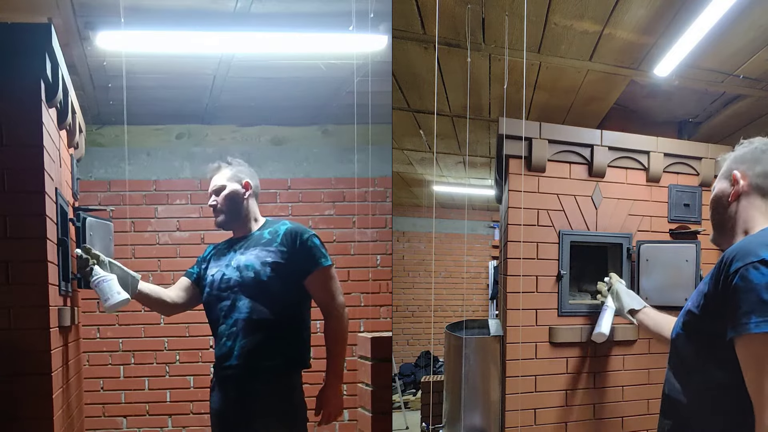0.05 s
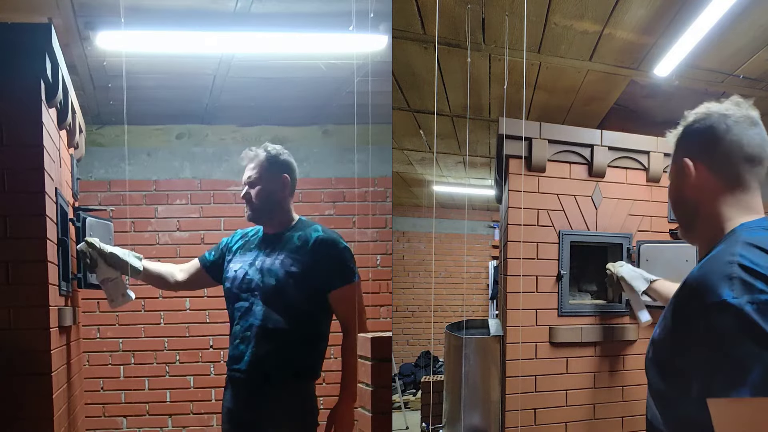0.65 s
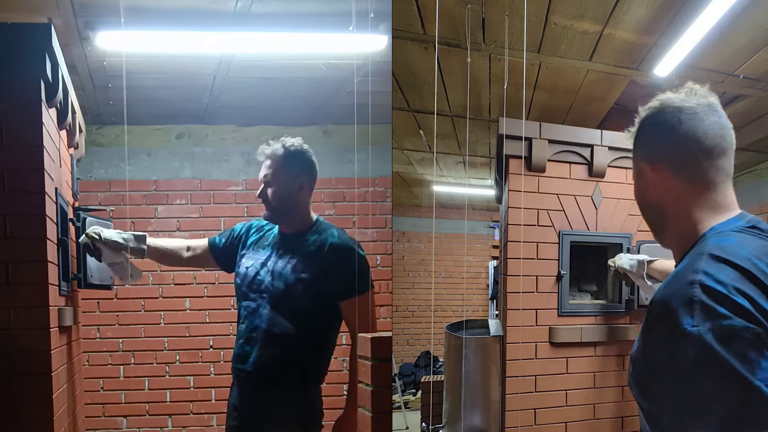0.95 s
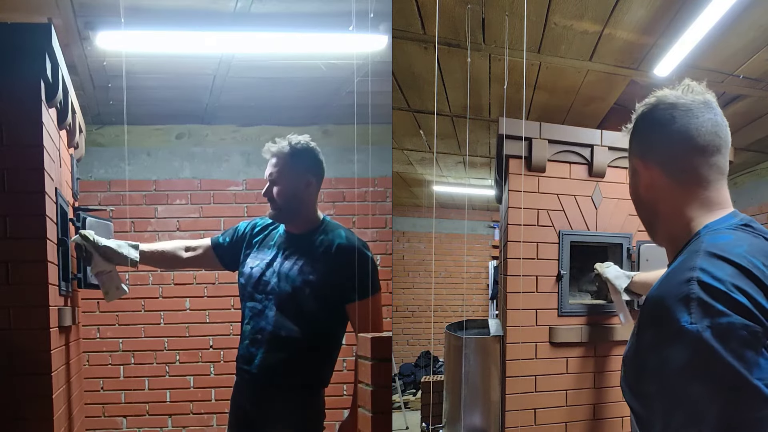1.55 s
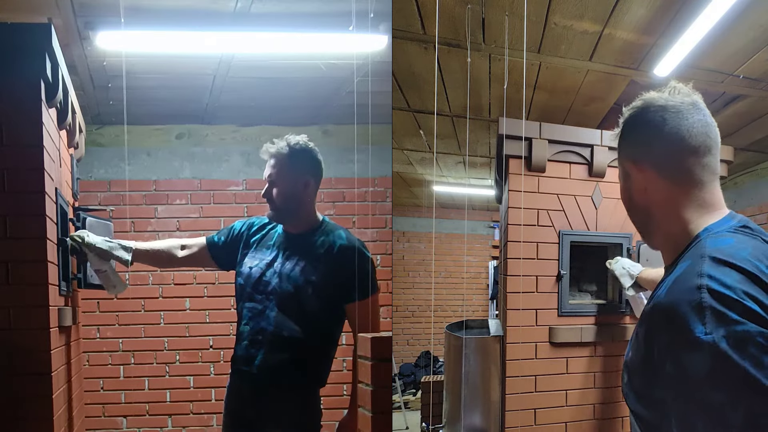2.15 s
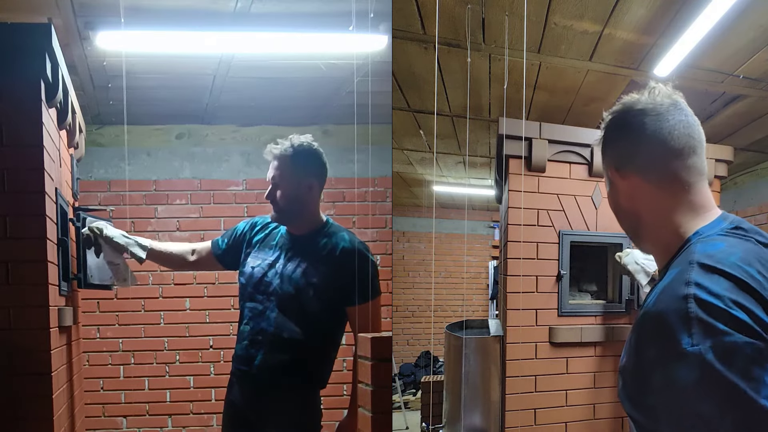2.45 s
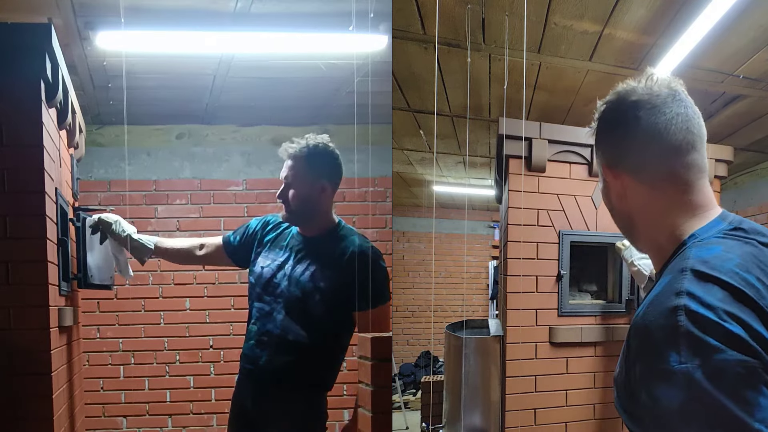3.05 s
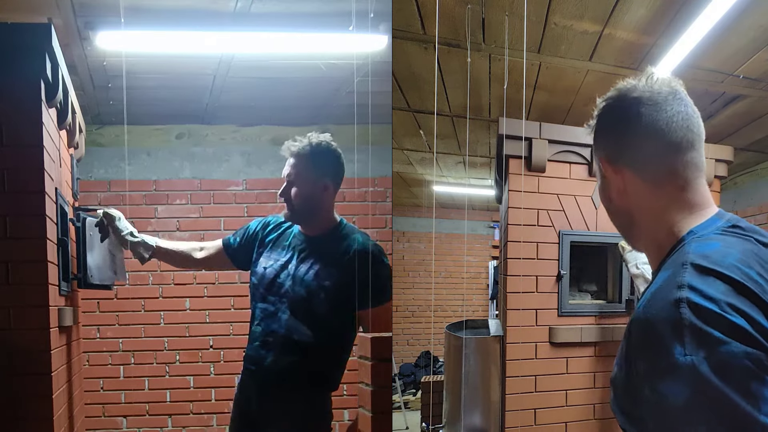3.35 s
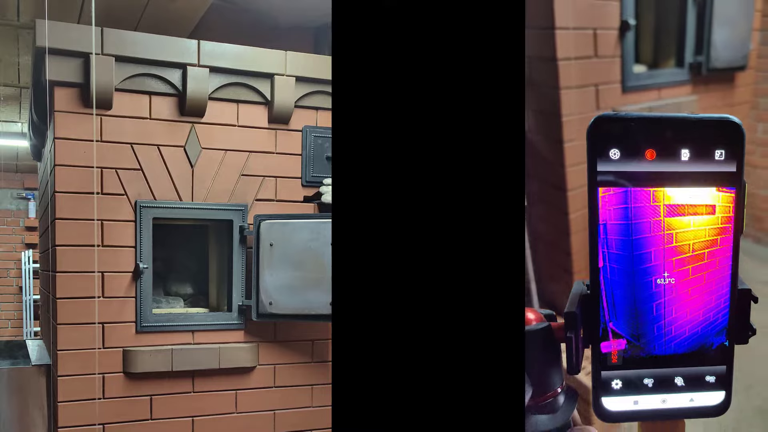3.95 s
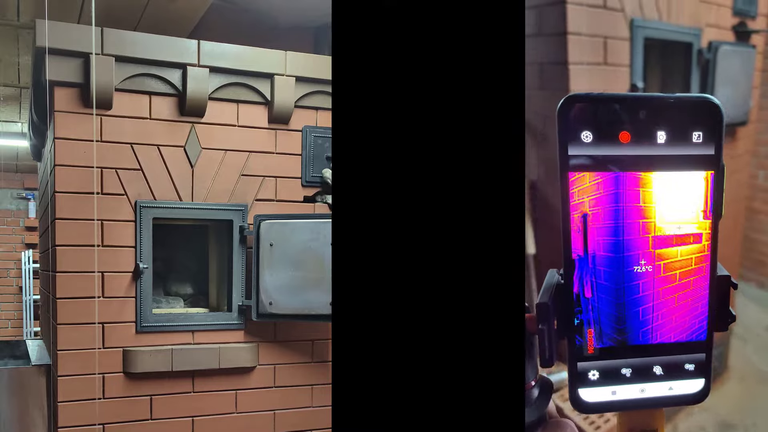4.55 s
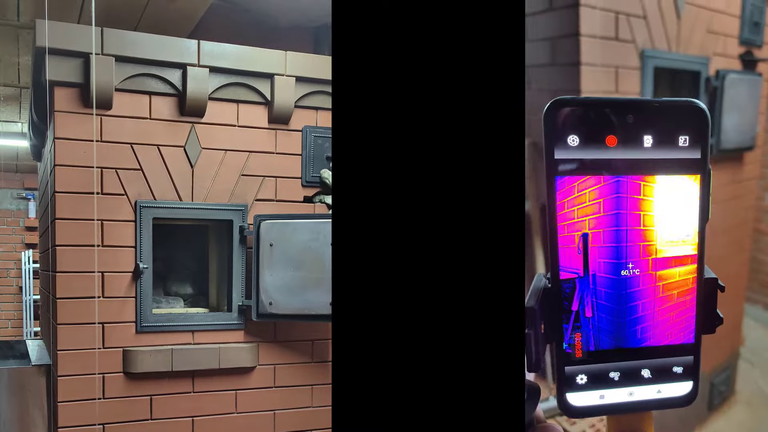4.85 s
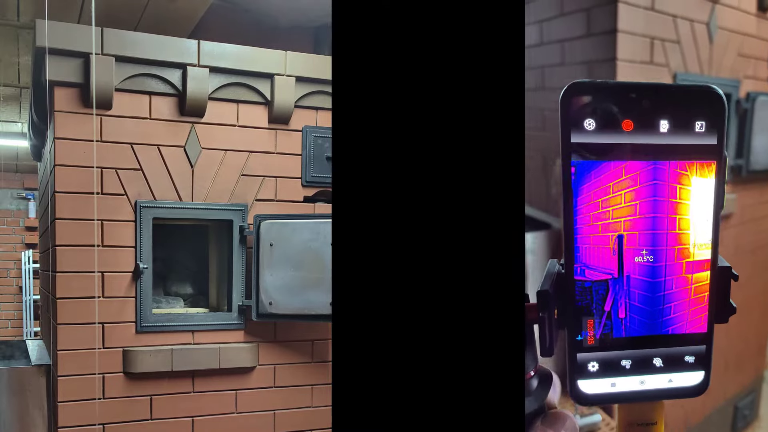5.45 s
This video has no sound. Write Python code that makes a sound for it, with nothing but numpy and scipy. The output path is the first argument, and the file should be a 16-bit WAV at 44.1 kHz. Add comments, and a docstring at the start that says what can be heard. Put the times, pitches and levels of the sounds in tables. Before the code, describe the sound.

In a quiet workshop, a trigger bottle squirts water into a hot brick stove seven times, about every half second. Each jet patters on iron, rings hollow in the firebox and sizzles into steam, with a few plastic trigger clicks between. Then an iron plate slides in one grinding, squeaking stroke with a low rumble. Soft cloth scuffs and a dull knock follow, all heard from nearby.

```python
"""Water on a hot stove

A trigger bottle squirts seven times into the firebox of a brick stove in a workshop. Each jet patters
on the iron, the firebox rings hollow, the water sizzles away and the trigger springs back. Then an
iron plate, likely the damper, grinds and squeaks along its slot and rumbles in the flue.
A few cloth scuffs and a knock follow, over quiet room air and the stove's draught."""
import sys
import numpy as np
from scipy import signal
from scipy.fft import rfft, irfft
from scipy.io import wavfile

SR = 44100
rng = np.random.default_rng(int(sys.argv[2]) if len(sys.argv) > 2 else 0)


def dump(signal):
    """Clip the signal to [-1, 1] and save it as 16-bit WAV at the path in sys.argv[1]."""
    limited = np.clip(np.atleast_2d(signal).T, -1, 1)
    pcm = np.round(limited * 32767).astype(np.int16)
    wavfile.write(sys.argv[1], SR, pcm)


N = 252230
TIME = np.arange(N) / SR
FREQS = np.maximum(np.arange(N // 2 + 1) * SR / N, 1)

# Table levels are relative: each layer has its own trim in the mix.
# Stereo image, narrow in the bass and wide on top: frequency_hz, correlation
STEREO_IMAGE = [(100, .95), (300, .87), (500, .72), (750, .45), (1200, .15), (2200, .28), (4000, -.05),
                (15000, -.02)]

# EQ curves for the noise layers: frequency_hz, level_db
ROOM_EQ = [(12, -35.5), (20, -5), (68, -3), (207, -16), (581, -24), (1040, -30), (4070, -28), (6020, -25),
           (7310, -35.5), (10500, -28.5), (15500, -30.5)]   # still workshop air
DRAUGHT_EQ = [(20, 1), (35, 3.5), (60, -7.5), (105, 0), (190, -11.5), (400, -27), (2000, -69.5)]   # deep moving air
JET_EQ = [(250, -40), (700, -5.5), (1150, -6.5), (1600, -0.5), (2200, 0), (3200, 0.5), (4300, -2),
          (6000, 0), (7600, -9), (10000, -6.5), (16000, -22.5)]   # water pattering on iron
SIZZLE_EQ = [(400, -59.5), (1500, -21.5), (3200, -7), (4200, -5), (5700, -1), (6600, 1), (7600, -4),
             (9300, 0), (12500, 0.5), (14400, 1), (16000, 0.5)]   # bright steam hiss
CLOTH_EQ = [(88, -31), (150, 7), (428, -0.5), (966, -6.5), (1270, 2.5), (1480, -2.5), (2140, -1.5),
            (3830, -6), (5990, -7), (7860, -18), (12300, -18.5), (15500, -26.5)]   # rubbing fabric
GRIT_EQ = [(200, -10), (450, 0), (900, -3), (2000, -1), (3000, -7), (3700, -17), (7000, -24), (15000, -32)]   # scraping in the slot

# Resonator banks: pitch_hz, width_hz, level_db
FIREBOX_MODES = [(315, 110, -8), (387, 32, 5.5), (607, 120, 2.5), (865, 92, 3), (1181, 180, 0),
                 (1490, 89, -3)]   # the hollow fire chamber
PLASTIC_MODES = [(2170, 700, -10), (3100, 1000, -3.5), (5700, 1300, 2.5), (10000, 3500, 2.5),
                 (14000, 3000, -1.5)]   # lever and piston
PLATE_GRIND_MODES = [(508, 91, -17), (658.4, 20, -1.5), (990, 320, -20), (1199, 33, -4.5), (1296, 55, 0.5),
                     (1389, 15, -5.5), (1550, 230, -12), (1863, 170, -8.5), (2073, 83, -13),
                     (2326, 36, -14), (2620, 120, -12.5), (2810, 66, -8), (3050, 79, -7.5), (3164, 28, -4),
                     (3355, 110, -14.5)]   # the iron plate's midrange
PLATE_SQUEAL_MODES = [(3912, 28, -8), (4180, 40, -8), (4322, 24, -3), (5125, 24, -2.5), (5510, 36, -3),
                      (6490, 36, -8), (6605, 45, -2), (6868, 28, -1), (6976, 30, -4), (7870, 45, -12),
                      (8260, 95, -9), (8640, 60, -7), (9410, 45, -11), (9822, 36, -7), (9950, 40, -11),
                      (10255, 40, -7), (10480, 40, -7), (10720, 45, -11), (11200, 36, -11), (11750, 36, -7),
                      (12060, 55, -7), (12590, 40, -10), (13170, 36, -12), (13880, 70, -9),
                      (14200, 36, -13), (14560, 50, -10), (15200, 42, -11)]   # its narrow treble lines
PLATE_SHEEN_MODES = [(4140, 620, 1.5), (5470, 350, 6), (7090, 530, 3.5), (8100, 310, -7.5),
                     (10700, 1900, 1.5), (12300, 570, 2), (14200, 800, -7.5)]   # its weak modes, merged into bands
BRICK_MODES = [(92.5, 28, 6.5), (115.7, 17, 4), (172, 47, -10), (339.6, 40, -17.5)]   # the stove's heavy body
FLUE_MODES = [(146, 20, 0), (274, 16, 1), (310, 60, -7)]   # the booming air in the flue
SEATED_IRON_MODES = [(198.6, 79.8, 13), (450, 170, 6.5), (890, 289, 3), (1450, 320, -7), (2620, 500, -22),
                     (5420, 1000, 1), (5980, 420, 1.5), (13320, 4700, -3)]   # iron seated in brick

# Trigger squeezes: start_s, rise_s, hold_s, jet_db, ring_db, burst_db, sizzle_db, fade_db_per_s, air_db
SQUEEZES = [ (-0.06, 0.052, .04, -36.5, -41, -29.5, -45.5, 13, -48.5),
            (0.4, 0.07, 0.031, -24.5, -34, -26, -52, 42.5, -45),
            (1.021, 0.056, 0.042, -22.5, -32.5, -26.5, -34.5, 74.5, -44),
            (1.545, 0.076, 0.034, -26, -32.5, -28, -42.5, 70, -42.5),
            (2.014, 0.052, 0.084, -26.5, -35, -28, -34.5, 57, -42),
            (2.695, 0.074, .045, -29.5, -42.5, -25, -32, 46, -49.5),
            (3.201, 0.072, 0.017, -31.5, -45, -25.5, -37, 20, -50), ]
# Late drops landing in the firebox as the trigger is let go: peak_s, ring_db, hiss_db
LATE_DROPS = [(0.192, -48, -39), (0.29, -53, -70.5), (0.751, -46.5, -53.5), (1.38, -56, -53.5),
              (1.917, -48.5, -43.5), (2.35, -44.5, -45)]
# The front of a hard jet slapping the iron: start_s, level_db
JET_SLAPS = [(0.427, -26), (1.036, -11), (2.05, -14)]
# Clicks of the trigger: start_s, level_db
TRIGGER_CLICKS = [(0.188, -33), (1.914, -35), (1.9469, -34), (2.3633, -17), (2.439, -47), (2.4994, -26),
                  (2.596, -36.5)]
# Glove and clothes scuffs: peak_s, rub_db, fizz_db, air_db
CLOTH_RUBS = [(3.775, -45, -66, -65), (4.786, -53, -76, -70), (4.825, -71, -73, -70), (5.0, -47, -58, -70),
              (5.29, -63.5, -68, -77), (5.605, -45, -53, -60), (5.685, -50.5, -47, -57),
              (5.72, -41.5, -56, -54)]
# Fader curve of the sliding plate's treble squeal: time_s, level_db
SQUEAL_FADER = [(3.785, -48), (3.83, -27.5), (3.93, -24.5), (4.01, -23.5), (4.1, -27.5), (4.175, -34.5),
                (4.205, -27.5), (4.38, -31.5), (4.425, -46.5), (4.455, -47.5), (4.52, -69)]
# The plate sticks and squeaks or groans on one resonance: peak_s, half_length_s, pitch_hz, level_db
PLATE_SQUEAKS = [(3.843, 0.026, 1250, -29), (3.858, 0.014, 512, -30), (3.907, 0.017, 5505, -14),
                 (3.912, 0.048, 5125, -24), (3.933, 0.0075, 1245, -21.5), (3.967, 0.04, 4322, -22),
                 (3.997, 0.012, 1245, -17), (4.13, 0.068, 1277, -27.5), (4.154, 0.074, 5505, -31),
                 (4.216, 0.05, 2735, -26.5), (4.268, 0.022, 6868, -28), (4.27, 0.076, 274, -31)]
# The plate bumps to rest, then a knock on the stove: start_s, level_db
IRON_KNOCKS = [(4.445, -31.5), (4.537, -49.5), (4.772, -50.5), (5.597, -27)]

JET_FALL_DB_PER_S, BURST_FALL_DB_PER_S = 119, 123   # as the pressure drops
SQUEEZE_S, SHUT_DB_PER_S = 0.19, 139   # the piston bottoms and the jet breaks off
RING_RISE_S, RING_HOLD_S, RING_FALL_DB_PER_S = 0.038, .13, 155   # the firebox rings while water lands
WET_S = 0.25   # the iron sizzles fully until this long after a squeeze starts, then dries
SIZZLE_RING_DB, SIZZLE_PATTER_DB = -20.5, -12   # boiling drops also ring the firebox and tick on iron
SIZZLE_END_S, SIZZLE_STOP_DB_PER_S = 3.725, 219
STIR_HOLD_S, STIR_FALL_DB_PER_S = 0.063, 56.5   # air stirred by a squirt or a scuff
DROP_RISE_S, SCUFF_RISE_S = 0.023, 0.054
SLIDE_START_S = 3.775   # the plate is pulled in one stroke


def from_db(db):
    """Decibels to gain."""
    return 10 ** (np.asarray(db) / 20)


def rms_one(x):
    """Scale to unit power."""
    return x / np.sqrt(np.mean(x ** 2) + 1e-20)


def at_hz(points):
    """Read a curve at every frequency, on a log axis."""
    hz, value = np.transpose(points)
    return np.interp(np.log(FREQS), np.log(hz), value)


def noise():
    """Two unrelated channels of white noise."""
    return rng.standard_normal((2, N))


def drift(rate_hz):
    """Smooth random modulation of unit power."""
    hop, settle = 40, 2000
    pole = np.exp(-2 * np.pi * rate_hz * hop / SR)
    steps = rng.standard_normal(N // hop + settle + 2)
    slow = signal.lfilter([1], [1, -2 * pole, pole * pole], steps)[settle:]
    return np.interp(np.arange(N) / hop, np.arange(len(slow)), rms_one(slow))


def grains(per_s, spread_db, smooth=1.0):
    """Tiny impacts of uneven size over a share of smooth turbulence, in two channels."""
    sizes = from_db(spread_db * np.minimum(rng.exponential(1, N), 4))
    clicks = (rng.random(N) < per_s / SR) * sizes * noise()
    return rms_one(rms_one(clicks) + smooth * noise())


def stroke(start_s, rise_s, hold_s, fall_db_per_s):
    """Envelope that climbs from silence to 1, holds and dies away."""
    t = TIME - start_s
    attack = np.clip(t / rise_s, 0, 1) ** 1.43
    return attack * from_db(-fall_db_per_s * np.maximum(t - rise_s - hold_s, 0))


def blows(events, decay_s):
    """Envelope of hits that start at once and die away."""
    return sum(from_db(db) * (TIME >= s) * np.exp(-np.abs(TIME - s) / decay_s) for s, db in events)


def spread(x):
    """Two unrelated channels become left and right: alike in the bass, diffuse in the treble."""
    alike = np.clip(at_hz(STEREO_IMAGE), -.99, .99)
    mid, side = rfft(x) * np.sqrt([1 + alike, 1 - alike])
    return irfft([mid + side, mid - side], N) / np.sqrt(2)


def pan(x, left_db):
    """Lean towards the left ear."""
    return x * from_db([[left_db / 2], [-left_db / 2]])


def colour(x, eq):
    """Shape an excitation with an EQ curve; stereo, unit power."""
    return rms_one(spread(irfft(rfft(x) * from_db(at_hz(eq)), N)))


def resonate(x, hz, width_hz):
    """One resonance with gain 1 at its peak."""
    radius = np.exp(-np.pi * width_hz / SR)
    zeros = np.array([1, 0, -1]) * (1 - radius ** 2) / 2
    poles = [1, -2 * radius * np.cos(2 * np.pi * hz / SR), radius ** 2]
    return signal.lfilter(zeros, poles, x + 1e-18)


def body(force, modes, wander_db, skirt_hz):
    """One force rings steep-skirted modes; their shares can wander as the contact moves."""
    power = rings = 0
    for hz, width_hz, db in modes:
        share = from_db(db) * rms_one(from_db(wander_db * drift(13)))
        rings += share * resonate(resonate(force, hz, width_hz), hz, skirt_hz)
        power += from_db(2 * db) * np.pi * width_hz * skirt_hz / (width_hz + skirt_hz) / SR
    return spread(rings / np.sqrt(power))


def rebound(x, echo_db, patterns=8):
    """Close iron and brick walls comb the sound; the pattern shifts as the aim moves."""
    t = TIME[:600]
    reflected = power = 0
    for _ in range(patterns):
        echoes = rng.standard_normal((2, len(t))) * np.exp(-t / .005) * (t > .001)
        echoes *= from_db(echo_db) / np.sqrt(np.sum(echoes ** 2, axis=1, keepdims=True))
        weight = drift(5)
        reflected += weight * signal.oaconvolve(x, echoes, axes=1)[:, :N]
        power += weight ** 2
    return rms_one(x + reflected / np.sqrt(power))


def workshop(x, wet_db, t60_s=0.2):
    """Add the short, diffuse tail of the brick room."""
    t = TIME[:SR // 2]
    tail = rng.standard_normal((2, len(t))) * from_db(-60 * t / t60_s) * (t > .006)
    tail /= np.sqrt(np.sum(tail ** 2, axis=1, keepdims=True))
    return x + from_db(wet_db) * signal.fftconvolve(x, tail, axes=1)[:, :N]


def room_bed():
    """Quiet room air and the low draught of the stove."""
    return from_db(-61.5) * colour(noise(), ROOM_EQ) + from_db(-66.5) * colour(noise(), DRAUGHT_EQ)


def squirts():
    """Envelopes of ring, jet, steam and air: each squeeze drives all four and leaves water sizzling."""
    jet = hollow = burst = sizzle = air = 0
    for start, rise, hold, jet_db, ring_db, burst_db, sizzle_db, fade, air_db in SQUEEZES:
        valve = from_db(-SHUT_DB_PER_S * np.maximum(TIME - start - SQUEEZE_S, 0))
        jet += from_db(jet_db) * valve * stroke(start, rise, hold, JET_FALL_DB_PER_S)
        hollow += from_db(ring_db) * stroke(start, RING_RISE_S, RING_HOLD_S, RING_FALL_DB_PER_S)
        burst += from_db(burst_db) * valve * stroke(start, rise, hold, BURST_FALL_DB_PER_S)
        sizzle += from_db(sizzle_db) * stroke(start, rise, WET_S - rise, fade)
        air += from_db(air_db) * stroke(start, RING_RISE_S, STIR_HOLD_S, STIR_FALL_DB_PER_S)
    sizzle *= from_db(-SIZZLE_STOP_DB_PER_S * np.maximum(TIME - SIZZLE_END_S, 0))
    hollow = np.hypot(hollow, from_db(SIZZLE_RING_DB) * sizzle)
    jet = np.hypot(jet, from_db(SIZZLE_PATTER_DB) * sizzle)
    steam = np.hypot(burst, sizzle)
    return hollow, jet, steam, air


def spray():
    """Droplets drum on hot iron inside the firebox and burst into steam."""
    hollow, jet, steam, air = squirts()
    for peak_s, ring_db, hiss_db in LATE_DROPS:
        landing = stroke(peak_s - DROP_RISE_S, DROP_RISE_S, hold_s=0.0072, fall_db_per_s=257)
        hollow += from_db(ring_db) * landing
        jet += from_db(hiss_db) * landing
        steam += from_db(hiss_db - 13) * landing
    jet += from_db(-23) * blows(JET_SLAPS, decay_s=0.036)
    hollow += from_db(-18.5) * blows(JET_SLAPS, decay_s=0.015)
    drops = rebound(grains(per_s=3200, spread_db=-1, smooth=0.81), echo_db=7.5)
    boiling = rebound(grains(per_s=2600, spread_db=0.5), echo_db=-1)
    drumming = grains(per_s=1600, spread_db=-1.5)
    patter = from_db(3) * jet * colour(drops, JET_EQ)
    ring = from_db(3) * hollow * body(drumming, FIREBOX_MODES, wander_db=3, skirt_hz=510)
    sputter = from_db(0.25 * drift(35))
    sizzle = from_db(5) * steam * sputter * colour(boiling, SIZZLE_EQ)
    puff = air * colour(noise(), DRAUGHT_EQ)
    return pan(ring, left_db=1.3) + pan(patter, left_db=-0.1) + pan(sizzle, left_db=0.5) + puff


def trigger():
    """The plastic lever and piston snap back with a short rasp."""
    force = from_db(-2.5) * blows(TRIGGER_CLICKS, decay_s=0.011) * noise()
    snap = body(force, PLASTIC_MODES, wander_db=0, skirt_hz=6000)
    return workshop(snap, wet_db=-9.5)


def scuffs():
    """Cloth rubs in short strokes, fizzy on top, and stirs the air."""
    rub = fizz = air = 0
    for peak_s, rub_db, fizz_db, air_db in CLOTH_RUBS:
        start = peak_s - SCUFF_RISE_S
        swipe = stroke(start, SCUFF_RISE_S, hold_s=0.0061, fall_db_per_s=196)
        rub += from_db(rub_db) * swipe
        fizz += from_db(fizz_db) * swipe
        air += from_db(air_db) * stroke(start, SCUFF_RISE_S, STIR_HOLD_S, STIR_FALL_DB_PER_S)
    fibres = grains(per_s=4400, spread_db=3, smooth=0.77)
    rustle = from_db(-1) * rub * colour(fibres, CLOTH_EQ)
    top = from_db(4) * fizz * colour(noise(), SIZZLE_EQ)
    return rustle + top + air * colour(noise(), DRAUGHT_EQ)


def damper():
    """Stick and slip ring the iron plate's modes; the slot damps them, so they follow the stroke."""
    slide = from_db(-25.5) * stroke(SLIDE_START_S, rise_s=0.099, hold_s=0.48, fall_db_per_s=226)
    squeal_db = np.interp(TIME, *np.transpose(SQUEAL_FADER), left=-np.inf, right=-np.inf)
    friction = grains(per_s=890, spread_db=1.5)
    grind = from_db(0.5) * slide * body(friction, PLATE_GRIND_MODES, wander_db=4, skirt_hz=450)
    lines = body(friction, PLATE_SQUEAL_MODES, wander_db=4.6, skirt_hz=170)
    sheen = from_db(-9.5) * body(friction, PLATE_SHEEN_MODES, wander_db=4, skirt_hz=300)
    squeal = from_db(squeal_db + 4) * (lines + sheen)
    grit = from_db(-5) * slide * colour(friction, GRIT_EQ)
    return pan(grind + grit, left_db=0.5) + squeal


def flue_rumble():
    """The juddering plate shakes the brickwork; the flue booms more as the plate clears it."""
    swell = from_db(-29) * stroke(SLIDE_START_S, rise_s=0.11, hold_s=0.51, fall_db_per_s=118)
    judder = grains(per_s=290, spread_db=4.5)
    thud = from_db(-7) * body(judder, BRICK_MODES, wander_db=0, skirt_hz=113.8)
    opening_db = np.interp(TIME, [3.9, 4.25], [-14, -2.5])
    boom = from_db(opening_db) * body(judder, FLUE_MODES, wander_db=-2, skirt_hz=98)
    return swell * (thud + boom)


def squeaks():
    """While the plate sticks, one resonance takes over, swells and wavers."""
    out = 0
    for peak_s, half_length_s, hz, db in PLATE_SQUEAKS:
        swell = from_db(db) * np.exp(-2 * ((TIME - peak_s) / half_length_s) ** 2)
        cycles = np.cumsum(hz * (1 + .004 * drift(90))) / SR
        path_s = rng.uniform(0, 0.00041, (2, 1))   # each ear hears it by its own path
        out += swell * np.sqrt(2) * np.sin(2 * np.pi * (cycles - hz * path_s))
    return out


def knocks():
    """Dull, gritty hits of iron seated in brick."""
    force = from_db(-4) * blows(IRON_KNOCKS, decay_s=0.024) * noise()
    thunk = body(force, SEATED_IRON_MODES, wander_db=1, skirt_hz=1800)
    return workshop(thunk, wet_db=-8.5)


def scene():
    """The full stereo mix."""
    return room_bed() + spray() + trigger() + scuffs() + damper() + flue_rumble() + squeaks() + knocks()


def record(dry):
    """A steep low-pass takes off the very top."""
    cutoff_hz = 15600
    return signal.sosfilt(signal.ellip(12, .1, 90, cutoff_hz, fs=SR, output="sos"), dry)


dry = scene()
out = record(dry)
dump(out)
```